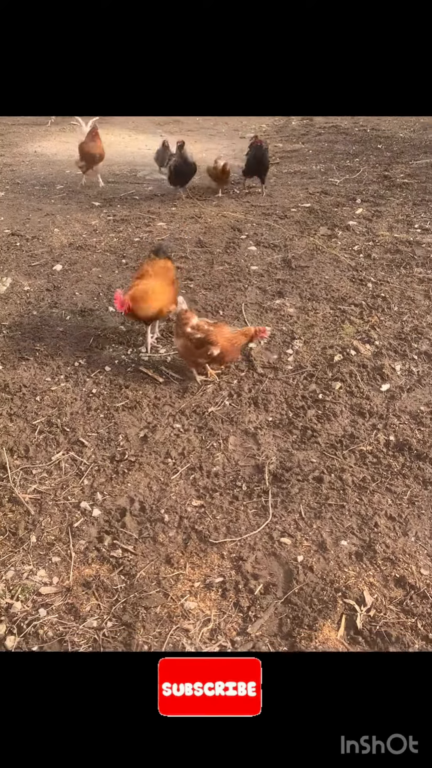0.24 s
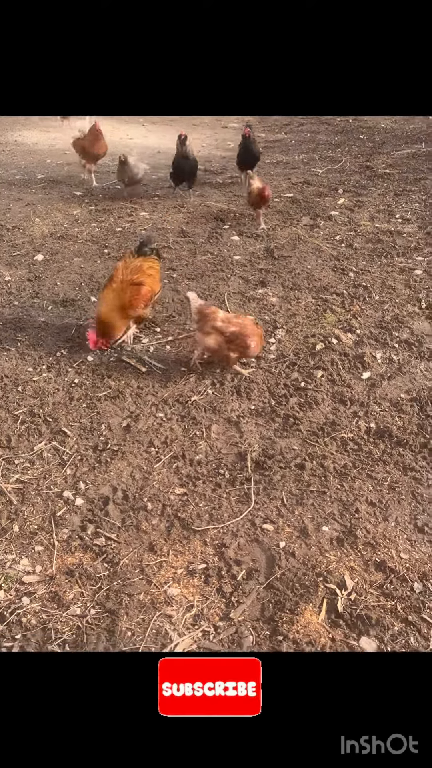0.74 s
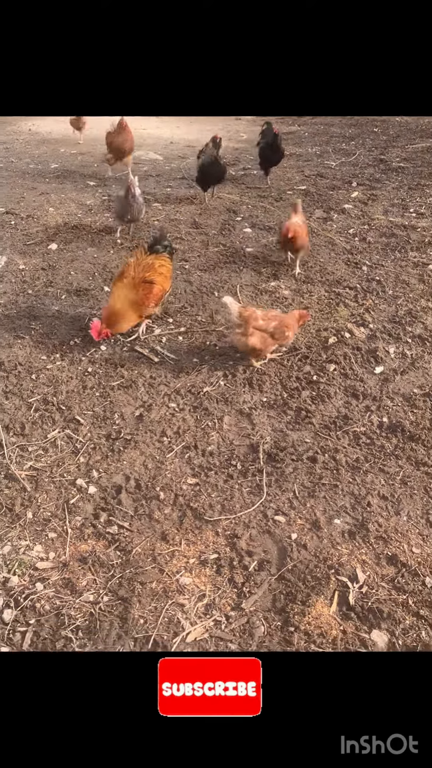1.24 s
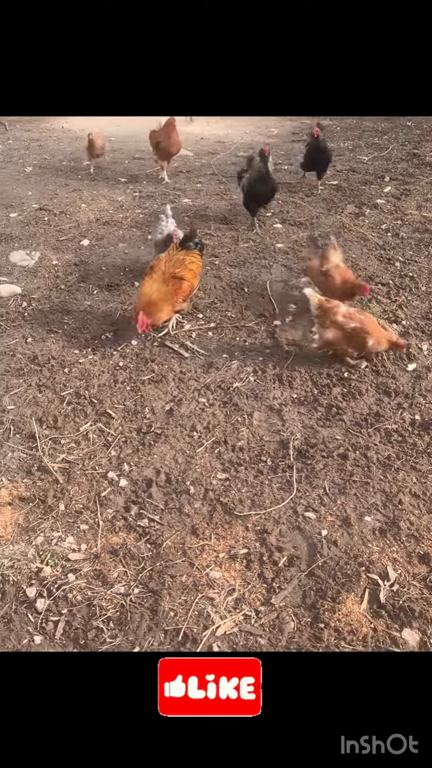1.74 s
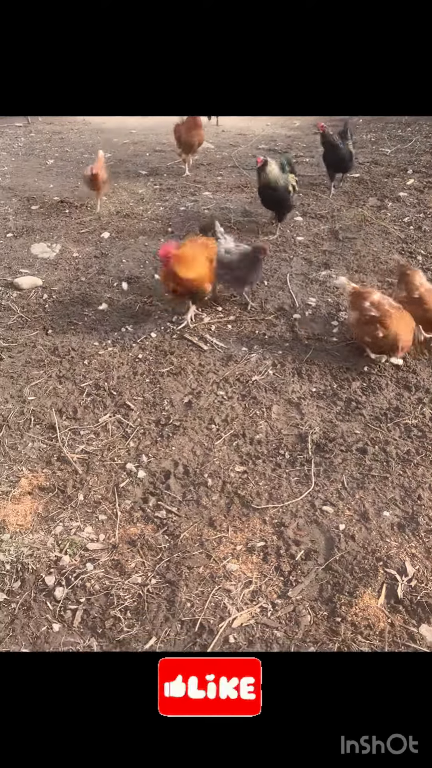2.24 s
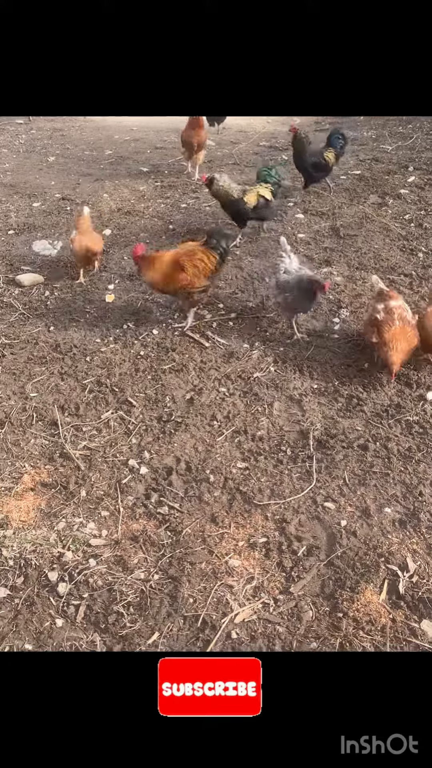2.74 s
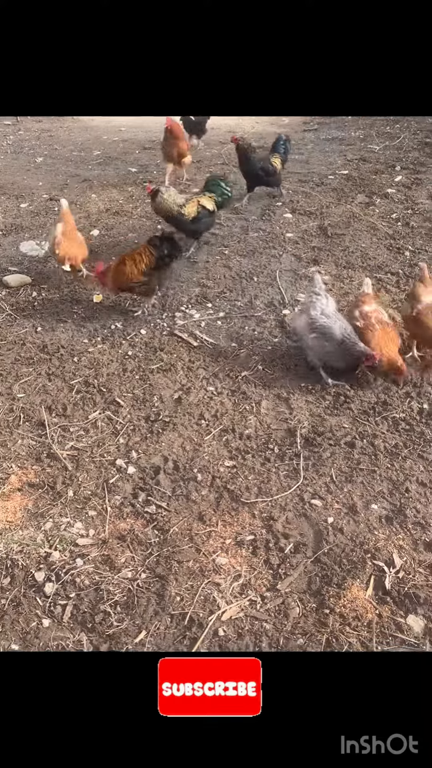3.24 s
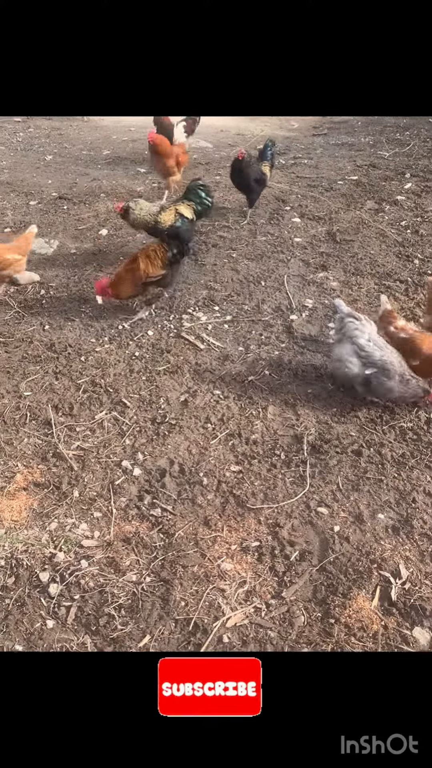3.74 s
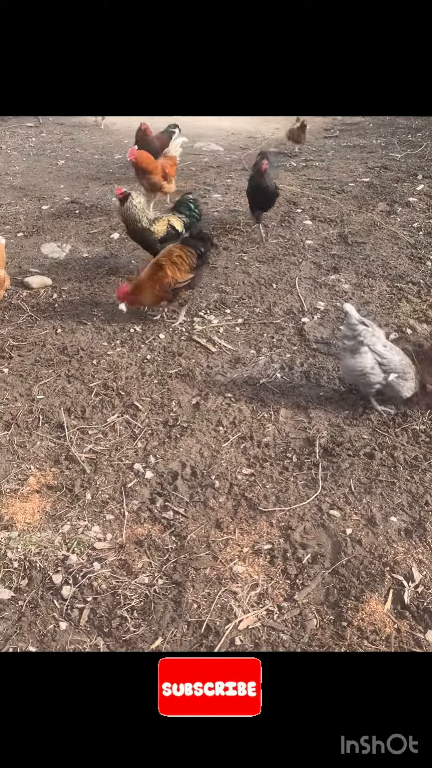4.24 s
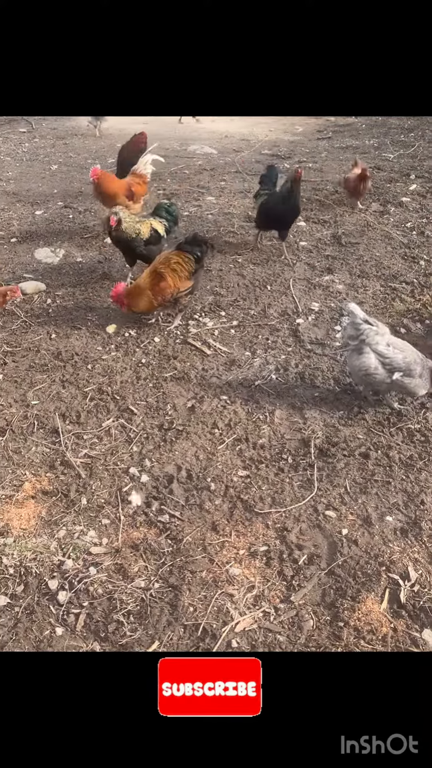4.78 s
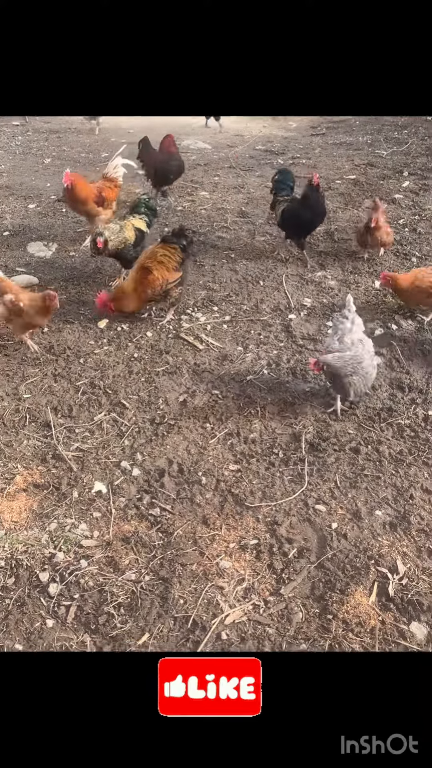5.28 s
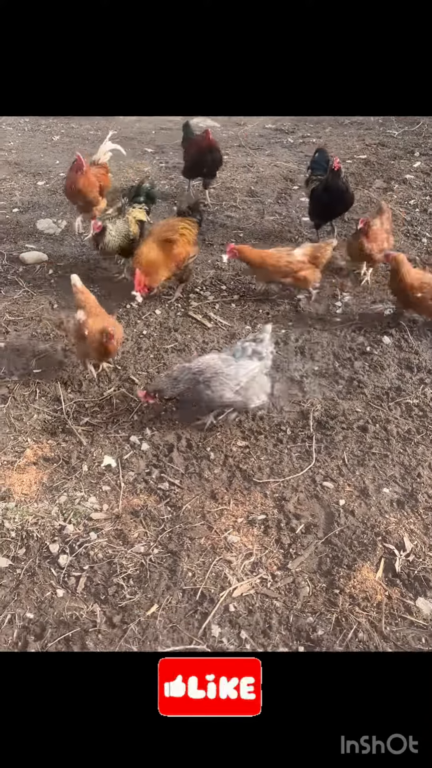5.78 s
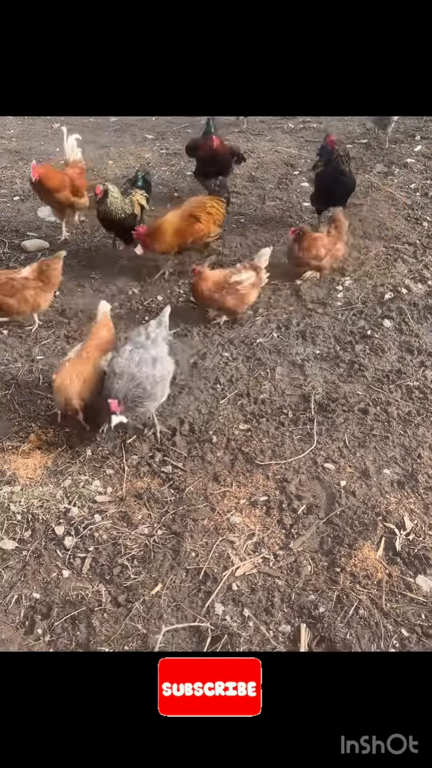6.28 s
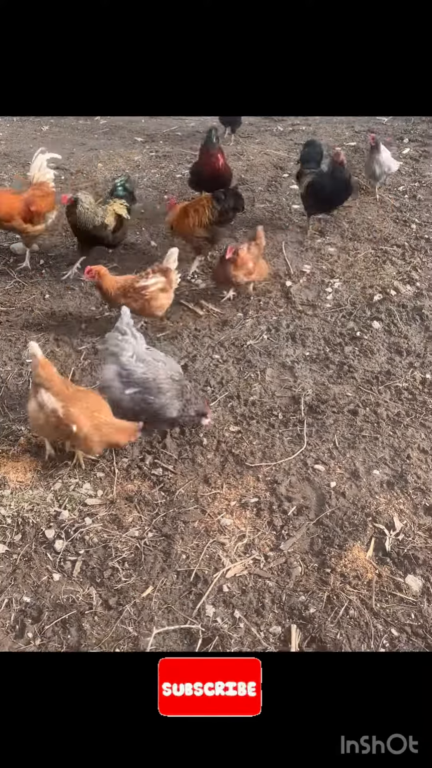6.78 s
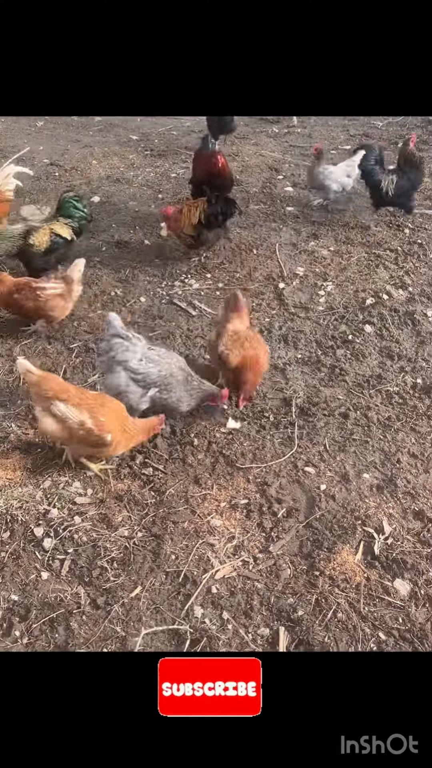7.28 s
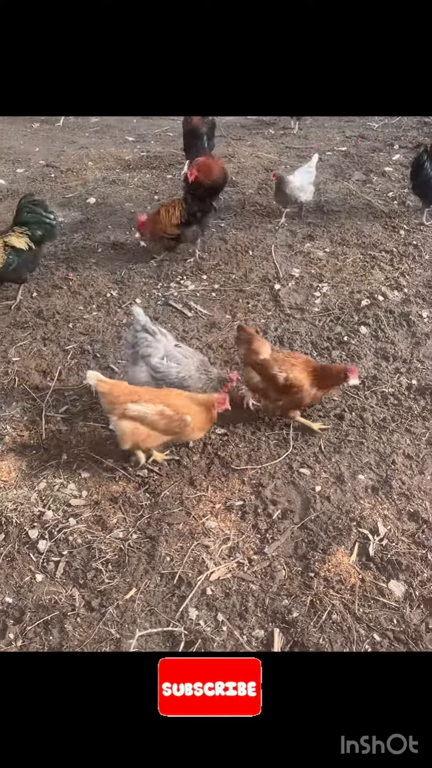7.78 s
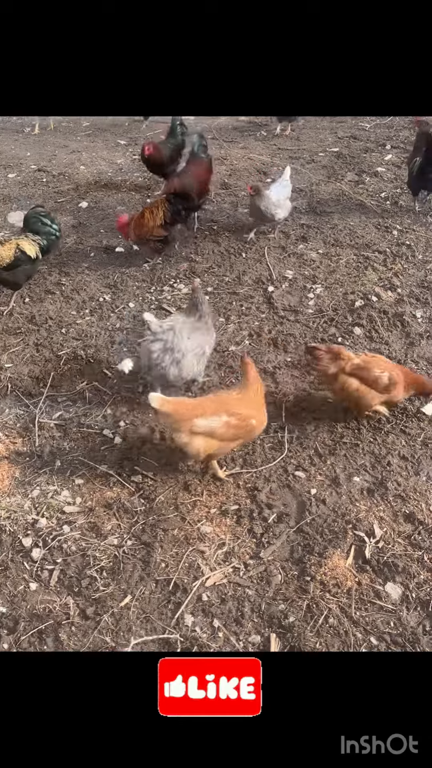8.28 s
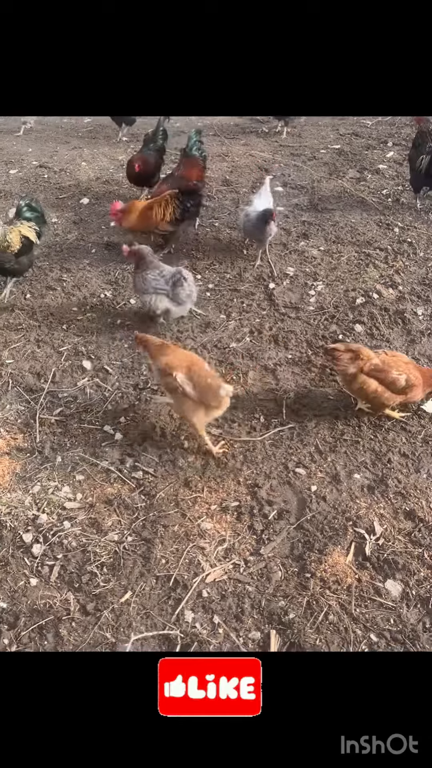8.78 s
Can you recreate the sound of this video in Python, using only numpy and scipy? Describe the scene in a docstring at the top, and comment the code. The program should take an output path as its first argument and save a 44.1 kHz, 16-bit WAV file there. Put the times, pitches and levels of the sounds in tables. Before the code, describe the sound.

Outdoor dirt yard, close microphone, wide treble, faint air and uneven low rumble. A dull rustle opens from 0 to 0.5 s with a short cluck and peck. At 0.5 s a near rooster crows loudly: a rough short syllable, a higher one from 0.8 s, then a held note from 1.4 to 2.7 s, swelling, turning raspy and sagging in pitch, with slight yard echo. From 2.7 s hens give short, dry clucks, with crisp pecks, soft thuds and a strong straw snap near 3.4 s. Quieter clucks run from 4 to 5.5 s, with a tiny peep at 4.65 s. Litter crackles more from 5.5 to 7.5 s, with many snaps and two firmer clucks around 6.5 and 6.8 s. A distant, hoarse rooster answers from 6.8 to 8.3 s. A pop comes at 7.95 s, then a bright scratch at 8.8 s amid low clucks.

```python
"""A dull rustle opens over faint air, rumble and the hiss of dry litter; hens cluck and peck, soft thuds below.
A rooster soon crows close by in three syllables; much later a second one answers from far off.
Voices are membrane pulses or harmonics through resonances; ground sounds are shaped noise and decaying tones.
Straws snap, a peep and a pop sound once each, a bright scratch comes late; the treble is spread in stereo."""
import sys
import numpy as np
from scipy import signal
from scipy.fft import rfft, irfft, next_fast_len
from scipy.io import wavfile
from scipy.ndimage import uniform_filter1d

SR = 44100
rng = np.random.default_rng(int(sys.argv[2]) if len(sys.argv) > 2 else 0)


def dump_mix(stems):
    """Bounce the given channels to the path in sys.argv[1] as a 16-bit WAV at rate SR."""
    frames = np.atleast_2d(stems).T  # one column per channel
    limited = np.clip(frames, -1, 1)  # hard clip at full scale
    pcm = np.round(limited * 32767).astype(np.int16)
    wavfile.write(sys.argv[1], SR, pcm)


N = 397782
T = np.arange(N) / SR
EDGE_HZ = 15900  # upper band limit

# breaking straw: hz, gain_db
STRAW_BREAK_COLOUR = [(5000, -32), (7600, -27), (8300, -4), (12000, -5), (16000, -1)]


def amp(db):
    """Decibels to gain."""
    return 10 ** (np.asarray(db) / 20)


def unit(x):
    """Scales to rms 1."""
    return x / np.sqrt(np.mean(x ** 2) + 1e-20)


def steady(x, size=700):
    """Holds the running rms at 1 over a window of size samples."""
    return x / np.sqrt(abs(uniform_filter1d(x ** 2, size)) + 1e-14)


def read(points, hz):
    """Reads a table on a log-frequency axis."""
    f, value = np.transpose(points)
    return np.interp(np.log(hz + 1), np.log(f + 1), value)


def shape(x, gain):
    """Filters x by a gain that is a function of frequency."""
    size = next_fast_len(len(x) + 2048)
    spectrum = rfft(x, size) * gain(np.fft.rfftfreq(size, 1 / SR))
    return irfft(spectrum, size)[:len(x)]


def colour(x, points):
    """Filters x by a (hz, gain_db) table."""
    return shape(x, lambda f: amp(read(points, f)))


def ring(x, modes):
    """Filters x by steep (hz, width_hz, gain_db) resonances."""
    def gain(f):
        return sum(amp(db) / (1 + (2 * (f - hz) / width) ** 2) ** 2 for hz, width, db in modes)
    return shape(x, gain)


def noise(points, count=N):
    """Coloured noise of rms 1."""
    return unit(colour(rng.standard_normal(count), points))


def drift(count, rate_hz):
    """Smooth random curve of rms 1, rolled off above rate_hz."""
    return unit(shape(rng.standard_normal(count), lambda f: np.exp(-(f / rate_hz) ** 2)))


def add(mix, s, sound):
    """Adds a sound to the mix at time s."""
    part = mix[max(round(s * SR), 0):][:len(sound)]
    part += sound[:len(part)]


def controls(rows):
    """Joins the rows of a table into one curve per column after time."""
    s, *columns = np.transpose(rows)
    t = np.arange(s[0], s[-1], 1 / SR)
    return [np.interp(t, s, c) for c in columns]


def air():
    """Steady yard air, as coloured noise, over a lumpy low rumble."""
    # rumble: time_s, relative_db
    rumble_curve = [(0.0, -69.5), (0.68, -69), (1.21, -83), (1.66, -63.5), (3.24, -68.5), (3.42, -79.5),
                    (5.57, -70.5), (6.28, -83.5), (6.73, -75.5), (7.21, -61), (7.84, -85), (8.11, -64),
                    (9.02, -84.5)]
    # rumble: hz, gain_db
    rumble_colour = [(15, -28.5), (40, 1.5), (70, 3), (120, -9.5), (400, -26), (4000, -100)]
    # air and hiss: hz, gain_db
    air_colour = [(90, -5.5), (180, -18), (350, -20.5), (570, -13), (850, -19.5), (1300, -22.5),
                  (2000, -29.5), (3500, -47), (5500, -37), (7700, -30), (8300, -46), (11000, -35.5),
                  (14000, -15.5), (15700, -21)]
    lumps_db = 3.5 * drift(N, rate_hz=10)
    rumble_db = np.interp(T, *np.transpose(rumble_curve)) + 10.5 + lumps_db
    rumble = noise(rumble_colour) * amp(rumble_db)
    return rumble + amp(-69.5) * noise(air_colour) * amp(1.5 * drift(N, rate_hz=21))


def litter(grains_per_s=80, spread_db=3.3, grain_decay_s=0.00047):
    """Feet stir straw and crumbs: fine hiss plus crackles made of decaying noise grains."""
    # stirring: time_s, relative_db
    stir_curve = [(0, -69), (.5, -61.5), (2.7, -62), (3.4, -61), (4.2, -63.5), (5, -62.5), (5.6, -57),
                  (6.3, -55.5), (6.7, -59.5), (7.3, -56.5), (7.8, -64.5), (8.2, -64.5), (8.6, -62.5)]
    # straw: hz, gain_db
    straw_colour = [(1500, -48), (4000, -11), (7600, -15), (8200, -9.5), (11000, -3.5), (14000, 1),
                    (16000, 7)]
    strength = amp(spread_db * np.minimum(rng.exponential(1, N), 4))
    clicks = (rng.random(N) < grains_per_s / SR) * strength
    grains = signal.lfilter([1], [1, -np.exp(-1 / (grain_decay_s * SR))], clicks)
    grains = grains * rng.standard_normal(N)
    level = amp(np.interp(T, *np.transpose(stir_curve)) + 1.8 * drift(N, rate_hz=13))
    hiss = amp(-1.0) * noise(straw_colour)
    crackle = amp(-3.5) * unit(colour(grains, straw_colour))
    return level * (hiss + crackle)


def scrape(rows, points, flutter_db):
    """Friction stroke: coloured noise with a drawn level and random flutter."""
    db, = controls(rows)
    count = len(db)
    out = np.zeros(N)
    stroke = noise(points, count=count) * amp(db + flutter_db * drift(count, rate_hz=35))
    add(out, rows[0][0], stroke * signal.windows.tukey(count, .03))
    return out


def rustle():
    """Dull friction noise at the start, and again softly as feet shuffle."""
    # first rustle: time_s, relative_db
    first_curve = [(0.0, -55.5), (.17, -54.5), (.27, -68), (.33, -73), (.38, -63.5), (.43, -67),
                   (.53, -61.5)]
    # shuffling feet: time_s, level_db
    shuffle_curve = [(5.12, -83.5), (5.28, -76), (5.38, -79.5), (5.47, -72.5), (5.68, -79)]
    # both: hz, gain_db
    dull_colour = [(90, -14), (140, -3.5), (330, 6), (650, 3.5), (1000, -7), (1300, -18.5), (2300, -16.5),
                   (3000, -30.5), (4000, -16), (8000, -35)]
    first = amp(3.0) * scrape(first_curve, dull_colour, flutter_db=1.0)
    return first + scrape(shuffle_curve, dull_colour, flutter_db=3.5)


def syrinx(hz, rough, jitter, half_share, breath, waver_db=0):
    """Membrane pulses with wavering overtones; when rough they jitter, alternate in strength, leak puffs."""
    count = len(hz)
    turns = np.cumsum(hz * (1 + jitter * rough * drift(count, rate_hz=150))) / SR
    pulses = np.zeros(count)
    for k in range(1, 29):
        waver = amp(waver_db * drift(count, rate_hz=7.7)) if waver_db else 1
        pulses += np.cos(2 * np.pi * k * turns) * (k * hz < EDGE_HZ) * waver
    pulses = unit(pulses) * (1 + half_share * rough * np.cos(np.pi * turns))
    puffs = unit((1 + np.cos(2 * np.pi * turns) / 2) * rng.standard_normal(count))
    return turns, pulses + breath * rough * puffs


def hens(swell=1.3, sag=0.11, linger_s=.003, chest_hz=700, beak_sharpness=2.0):
    """Clucks: a few sagging pulses swell and stop short through chest, throat and a beak loudest mid-note."""
    # clucks: start_s, length_s, pitch_hz, throat_hz, relative_db, chest_re_throat_db, beak_re_throat_db,
    # roughness (0-1)
    clucks = [(.122, 0.028, 303, 1410, -48.5, 2.5, -8, 0.78), (0.776, .032, 204, 390, -49.5, 2.5, -34, .2),
              (2.741, 0.033, 315.3, 890, -52, -8.5, -22, 0.52),
              (2.888, .034, 314, 844, -51.5, -10.5, -18, 0.51),
              (3.115, 0.037, 328.4, 910, -61.5, -7, -19, 0.77),
              (3.203, 0.043, 299.6, 856, -46.5, -7, -14.5, 0.54),
              (3.571, 0.035, 259.7, 599, -63, -5, -27.5, .65), (4.04, 0.029, 290, 792, -67, -4, -15, 0.55),
              (4.137, .026, 293, 782, -64, -1.5, -19.5, 0.38),
              (4.21, 0.032, 247, 600, -68.5, 3.5, -24, .42), (4.27, 0.031, 303, 797, -63.5, -1, -21, 0.54),
              (4.35, 0.038, 269, 706, -58.5, 3, -28, 0.33), (4.439, 0.035, 451, 1350, -62, -14, -14, 0.28),
              (4.539, .029, 485, 1380, -70.5, -12, -21, 0.48),
              (4.643, 0.055, 412.4, 1057, -66.5, 4, -18.5, 0.48),
              (4.739, 0.046, 347.4, 1010, -64, -20.5, -23, .25),
              (4.894, 0.024, 293, 710, -69, -5, -11, 0.46),
              (4.916, 0.041, 429, 990, -65.5, -12, -25.5, 0.07),
              (5.1, 0.034, 432, 1060, -63.5, -22, -29, 0.08), (5.191, .035, 470, 1390, -73, -11, -15, 0.38),
              (5.453, .025, 228, 612, -64.5, 5.5, -23, 0.42),
              (5.821, 0.05, 237.5, 762, -51.5, 5.5, -16, 0.54),
              (5.876, 0.015, 392, 1384, -61, 2, -10, 0.92),
              (5.929, 0.037, 271.5, 760, -55.5, 2.5, -11.5, 0.42),
              (6.149, 0.028, 303.5, 760, -64.5, -3.5, -19, .51),
              (6.384, 0.026, 314.6, 786, -63.5, -6, -13, 0.29),
              (6.497, 0.043, 321.3, 743, -43, -23, -14.5, 0.14),
              (6.772, .027, 465, 1110, -45, -28, -16.5, 0.15),
              (7.071, 0.029, 331.6, 800, -53.5, -0.5, -12, 0.6),
              (7.175, 0.038, 235.5, 430, -54, 9.5, -24, 0.21),
              (7.54, 0.031, 289, 574, -52, -23.5, -39, 0.14),
              (8.015, 0.029, 358, 1430, -50, -8.5, -11, 0.73),
              (8.416, 0.029, 201, 397.6, -68.5, 7, -16, 0.48),
              (8.519, 0.027, 192, 376, -61.5, 2, -23, 0.08),
              (8.647, 0.027, 229.6, 416, -62, 5.5, -21, 0.09), (8.854, .036, 214.7, 690, -55, 6, -18, 0.3)]
    # beak: hz, width_hz, gain_db
    beak_modes = [(1870, 800, 1.5), (2558, 470, -0.5), (3780, 1200, -8)]
    out, margin = np.zeros(N), SR // 200

    def linger(f):  # phase only: low tones come later
        return np.exp(-2j * np.pi * linger_s * chest_hz * np.log1p(f / chest_hz))

    for s, length, hz, throat_hz, db, chest_db, beak_db, rough in clucks:
        u = np.linspace(0, 1, int(length * SR))
        effort = np.sin(np.pi * u ** swell).clip(0)
        sagging_hz = hz * (1 + sag * (.5 - u))
        _, pulses = syrinx(sagging_hz, np.clip(rough, 0, 1), jitter=.2, half_share=.9, breath=1.6)
        note = shape(np.pad(pulses * effort, margin), linger)
        crest = np.pad(pulses * effort ** beak_sharpness, margin)
        chest = unit(ring(note, [(236, 440, 0)]))
        throat = unit(ring(note, [(throat_hz, .55 * throat_hz, 0), (950, 400, -16)]))
        beak = unit(ring(crest, beak_modes))
        cluck = throat + amp(chest_db) * chest + amp(beak_db) * beak
        add(out, s - margin / SR - linger_s / 2, amp(db - 5.0) * cluck)
    return out


def pecks(t60_s=0.039, knock_t60_s=0.047, brush_s=0.015, brush_db=-19):
    """A beak brushes into dry litter, then hits: a bright decaying snap over a duller knock."""
    # pecks: hit_s, snap_db, knock_relative_db
    peck_rows = [(.245, -54.5, 9), (.7527, -49.5, 0), (2.67, -50, -17), (3.011, -62.5, 4),
                 (3.234, -44.5, -9), (3.354, -39, -20), (4.417, -60.5, 4.5), (4.741, -64, 3),
                 (4.7648, -41, -18), (4.8505, -45, -16.5), (5.2509, -54, -0.5), (5.27, -66, 5),
                 (5.6547, -48, -16), (6.516, -44, -10), (7.3756, -49.5, -24), (8.388, -45, -9)]
    knock_colour = [(900, 5), (2000, -2), (4000, -3), (7000, 1.0), (10000, -25.0)]  # hz, gain_db
    out, t = np.zeros(N), np.arange(-SR // 50, SR // 20) / SR
    brush = amp(brush_db) * np.exp(-abs(t) / brush_s)
    for s, db, knock_db in peck_rows:
        snap = noise(STRAW_BREAK_COLOUR, count=len(t))
        knock = noise(knock_colour, count=len(t)) * amp(-60 * abs(t) / knock_t60_s)
        hit = snap * amp(-60 * abs(t) / t60_s) + amp(knock_db - 9.0) * knock
        add(out, s + t[0], amp(db) * np.where(t < 0, brush * snap, hit))
    return out


def thuds(rise_s=0.015, scuff_db=-7):
    """Soft blows: a few cycles of bass with a little scuff under one rise and decay."""
    # thuds: start_s (sounded 3 ms early), relative_db, pitch_hz
    thud_rows = [(.334, -60, 58), (.885, -51, 67.8), (1.566, -51, 103), (1.866, -51, 91.2),
                 (2.364, -49.5, 49.3), (2.453, -45, 81), (2.966, -54, 59.5), (3.222, -43, 84),
                 (3.253, -44.5, 90), (3.292, -50, 69.4), (3.595, -53.5, 70), (4.405, -52, 95.8),
                 (4.489, -58, 90), (4.64, -56.5, 108), (6.321, -41, 72), (7.235, -48, 70),
                 (7.447, -54.5, 61.8), (7.906, -51, 78.5), (8, -50.5, 57)]
    # scuff: hz, gain_db
    scuff_colour = [(20, -5), (130, 2.5), (250, -12.5), (500, -27.5), (5000, -85)]
    out, t = np.zeros(N), np.arange(SR // 6) / SR
    envelope = (t / rise_s * np.exp(1 - t / rise_s)) ** 2
    for s, db, hz in thud_rows:
        blow = np.sin(2 * np.pi * hz * t) + amp(scuff_db) * noise(scuff_colour, count=len(t))
        add(out, s - .003, amp(db + 9.0) * blow * envelope)
    return out


def roughness(t, lock_s, break_s, rough_before, rough_locked):
    """The voice starts rough, locks into a cleaner tone and breaks up; the held note catches once."""
    locked = (1 + np.tanh((t - lock_s) / 0.003)) / 2
    broken = (1 + np.tanh((t - break_s) / 0.0087)) / 2
    catch = 0.25 * np.exp(-((t - 2.3) / 0.027) ** 2)
    rough = rough_before * (1 - locked) + rough_locked * (locked - broken) + .75 * broken + catch
    return rough, locked


def strained_rasp(pulses, t, band_hz=500):
    """Uneven pulses fray every overtone; the rasp spurts and each band sputters by itself."""
    # strain in the held note: time_s, relative_db
    rasp_curve = [(1.7, -87.5), (1.9, -76), (1.96, -70.5), (2.06, -80), (2.13, -65.5), (2.19, -63),
                  (2.27, -71), (2.33, -68.5), (2.4, -73), (2.47, -64), (2.53, -82), (2.6, -105)]
    # rasp: hz, gain_db
    rasp_colour = [(300, 9), (1000, 1), (1500, 0), (2700, -4), (3400, -7), (4050, 4), (4650, -14),
                   (5400, -4.5), (8000, -8)]
    count = len(t)
    frayed = colour(pulses * drift(count, rate_hz=330), rasp_colour)
    frayed = frayed * amp(1.8 * drift(count, rate_hz=55))
    leak = np.zeros(count)
    for centre_hz in band_hz * np.arange(1, 18):
        sputter = amp(2.5 * drift(count, rate_hz=60))
        leak += ring(frayed, [(centre_hz, 2 * band_hz, 0)]) * sputter
    rasp_db = np.interp(t, *np.transpose(rasp_curve), left=-100, right=-100) + 9.5
    return unit(leak) * amp(rasp_db)


def syllable(curve, lock_s, break_s, rough_before, rough_locked, swing):
    """Pulses through a throat resonant near the second harmonic, with beak and shrill overtones above."""
    # upper throat as the beak moves: start_s, end_s, [(hz, width_hz, gain_db)]
    throat_stages = [(.4, 0.796, [(1770, 650, 6.5), (2480, 1900, -6.5), (4900, 340, -4.5),
                     (6200, 2600, -4.5)]), (.8, 1.384, [(3763, 236, 10), (5883, 1040, -7),
                     (6380, 330, -10.5), (7230, 560, 1)]), (1.38, 1.97, [(4898, 150, 8), (5850, 750, 0),
                     (6890, 570, -12)]), (1.97, 2.35, [(4870, 260, 5), (5470, 520, 5), (6800, 510, -1.5)]),
                     (2.35, 2.799, [(5100, 480, -3), (5830, 490, 14), (7200, 630, -11)])]
    # open beak: hz, width_hz, gain_db
    beak_modes = [(1890, 580, -5.5), (2750, 250, 2.5)]
    # main throat resonance: hz, gain_db
    bell_colour = [(800, -32.5), (1000, -7.5), (1150, -10), (1400, 4), (1720, -13.5), (1840, -15),
                   (1980, -49), (2500, -73.5)]
    # top of the voice: hz, gain_db
    sizzle_colour = [(7400, -49.5), (8400, -2.5), (10300, 4), (10800, 2.5), (12800, -1), (13800, 6),
                     (15700, 1)]
    hz, effort_db, fundamental_db, beak_db, shrill_db = controls(curve)
    count = len(hz)
    t = curve[0][0] + np.arange(count) / SR
    rough, locked = roughness(t, lock_s, break_s, rough_before, rough_locked)
    # slow tremble and fast flutter of pitch
    trembling_hz = hz * (1 + .003 * drift(count, rate_hz=30) + .002 * drift(count, rate_hz=230))
    turns, pulses = syrinx(trembling_hz, rough, jitter=.04, half_share=0.19, breath=0.56, waver_db=5.5)

    base_gain = amp(fundamental_db + 3 * drift(count, rate_hz=23))
    base = base_gain * steady(ring(pulses, [(670, 560, 0)]))
    # a rough membrane rattles, throwing sidebands around the main resonance
    rattle = 1 + rough ** 2 * (0.31 * np.cos(np.pi * turns) + 0.57 * drift(count, rate_hz=590))
    bell_gain = amp(effort_db - 1.8 + 1.16 * drift(count, rate_hz=24))
    bell = bell_gain * steady(colour(pulses, bell_colour) * rattle)
    beak = amp(beak_db + 3 * drift(count, rate_hz=25)) * steady(ring(pulses, beak_modes))
    upper = np.zeros(count)
    for start, end, modes in throat_stages:
        fade = uniform_filter1d(1. * ((start <= t) & (t < end)), size=3000)
        upper += ring(pulses, modes) * fade
    shrill = amp(shrill_db - 1) * steady(upper)

    # sizzle grows 0.23 dB per dB of effort, capped 8 dB under it; then 10.5 dB weaker unlocked, 3.5 locked
    sizzle_db = np.minimum(-49.5 + 0.23 * (effort_db + 27.5), effort_db - 8)
    sizzle = amp(sizzle_db - 7 * (1.5 - locked)) * steady(colour(pulses, sizzle_colour))
    rasp = strained_rasp(pulses, t)

    # above -41.5 dB of effort the main resonance leans right
    left = amp(-swing * np.maximum(effort_db + 41.5, 0))
    gains = np.array([left, np.ones(count)]) * np.sqrt(2 / (1 + left ** 2))
    ends = np.clip(np.minimum(t - t[0], t[-1] - t) / 0.006, 0, 1)
    return (base + gains * bell + beak + shrill + sizzle + rasp) * ends


def rooster():
    """The near crow: a short syllable, a longer one and the held note, each driven by its own curves."""
    # three syllables: time_s, pitch_hz, effort_db, fundamental_db, beak_db, shrill_relative_db
    OPENING = [(.516, 404, -58.5, -77.5, -73.5, -63), (.529, 448.3, -37, -68, -59, -53),
               (.545, 537, -32, -62, -58.5, -48.5), (.566, 581.4, -39, -59, -51.5, -46),
               (.594, 605, -32.5, -58, -57.5, -50), (.599, 699.3, -24.5, -46, -69, -44),
               (.646, 703, -23, -53, -58.5, -48.5), (.668, 691, -39, -47.5, -68.5, -51.5),
               (.725, 696, -56.5, -56.5, -73.5, -65)]
    MIDDLE = [(.819, 475.6, -55.5, -80.5, -70.5, -72.5), (.826, 498, -38, -69, -47.5, -56),
              (.84, 581.7, -35.5, -46, -58, -54.5), (.852, 725.8, -24.5, -42.5, -48.5, -40),
              (.9, 759.2, -25, -38.5, -61, -42.5), (.972, 714.3, -38.5, -56, -80, -57),
              (1.075, 756, -40, -67, -81.5, -60.5), (1.14, 737, -40, -55, -83, -56.5),
              (1.27, 725.5, -43.5, -59.5, -88, -61), (1.385, 689, -54, -61.5, -69, -66)]
    HELD = [(1.385, 709, -52.5, -68, -72.5, -68), (1.405, 690, -47, -59.5, -75.5, -67.5),
            (1.42, 679, -40, -49.5, -72, -68.5), (1.53, 693, -39.5, -66.5, -74, -67.5),
            (1.6, 681, -33, -44.5, -71, -63), (1.68, 701, -37, -60, -77, -63),
            (1.74, 695.2, -29, -49.5, -67, -49), (1.88, 696.5, -33.5, -54, -72, -57),
            (2, 695.3, -26, -56, -71.5, -45.5), (2.06, 686, -31.5, -50, -75, -50.5),
            (2.15, 686, -24.5, -41.5, -63.5, -52), (2.22, 671.4, -27.5, -42.5, -72, -58.5),
            (2.29, 670.8, -26, -56, -74.5, -63), (2.41, 658.2, -27.5, -43.5, -76.5, -53.5),
            (2.46, 654, -33, -55, -76, -51.5), (2.595, 637, -41.5, -60.5, -85, -57),
            (2.62, 625.5, -54.5, -54, -88, -67), (2.636, 629.6, -43.5, -66, -89.5, -76),
            (2.675, 610.5, -67, -60, -99, -90)]
    # syllables: curve, lock_s, break_s, rough_before (0-1), rough_locked (0-1), swing_right (dB per dB effort)
    syllables = [(OPENING, .594, .644, .4, .34, 0.47), (MIDDLE, .85, 1.295, 0.59, 0.013, 0.95),
                 (HELD, 1.44, 2.628, 0.6, .025, 1.24)]
    out = np.zeros((2, N))
    for row in syllables:
        for channel, sound in zip(out, syllable(*row)):
            add(channel, row[0][0][0], sound)
    return out


def snaps(crack_s=.0007, splinter_db=-15, splinter_s=.005):
    """A dry straw snaps: one very short, bright noise crack among softer splinters."""
    # snaps: crack_s, level_db
    snap_rows = [(3.3792, -28), (5.6316, -47), (5.8426, -44), (6.357, -45), (6.738, -47), (6.9536, -44),
                 (4.178, -39), (5.4874, -44), (8.131, -50), (5.7255, -34), (6.003, -39), (6.035, -46),
                 (6.209, -41.5), (6.408, -43), (6.4265, -36), (6.931, -43), (6.974, -34), (7.2998, -37),
                 (7.3292, -44), (7.5223, -51), (8.737, -36)]
    out, t = np.zeros(N), np.arange(-SR // 100, SR // 30) / SR
    crack = (t >= 0) * np.exp(-abs(t) / crack_s)
    envelope = crack + amp(splinter_db) * np.exp(-abs(t) / splinter_s)
    for s, db in snap_rows:
        add(out, s + t[0], amp(db) * envelope * noise(STRAW_BREAK_COLOUR, count=len(t)))
    return out


def peep(s=4.657, length_s=.045, start_hz=3080, sag_hz_per_s=5000, db=-70, waver_hz=170):
    """One faint, high, scratchy peep: a falling sine with fast random pitch waver."""
    out, t = np.zeros(N), np.arange(0, length_s, 1 / SR)
    hz = start_hz - sag_hz_per_s * t + waver_hz * drift(len(t), rate_hz=420)
    tone = np.sin(2 * np.pi * np.cumsum(hz) / SR)
    add(out, s, amp(db) * tone * np.hanning(len(t)))
    return out


def drag():
    """A claw drags through straw: one uneven friction stroke."""
    # drag: time_s, level_db
    drag_curve = [(5.53, -87), (5.57, -71), (5.7, -89)]
    # drag: hz, gain_db
    drag_colour = [(2500, -44), (3800, 11), (6000, 11), (9000, -10)]
    return scrape(drag_curve, drag_colour, flutter_db=6)


def far_rooster(strain=0.71, flutter_db=2.0):
    """The answering crow: harmonics 1, 1.5 and 2 of a wavering pitch, hoarser the louder it gets."""
    # overlapping notes, each: time_s, pitch_hz, relative_db, second_harmonic_relative_db, half_relative_db
    far_notes = [
        [(6.75, 668, -71, 2, -10), (6.82, 660, -67.5, 9, -16), (6.85, 657, -72, 5, -6), (6.865, 845, -66, 0, 1),
         (6.92, 850, -65, 4, 3), (6.97, 842, -79, -3, -4)],
        [(7.07, 761, -59, -4, -2), (7.11, 799, -54, -5.5, -16), (7.148, 895.5, -53.5, -5, -17),
         (7.195, 800.6, -54.5, -3, -13.5), (7.26, 830, -69.5, -1, -19), (7.33, 832, -60, -3.5, -16),
         (7.45, 845.6, -69, -1, -15), (7.53, 820, -73, -19.5, -14.5)],
        [(7.3, 674, -65, -11.5, -19), (7.42, 660, -66.5, -6.5, -24), (7.64, 646, -71, -23, -28.5)],
        [(7.64, 708.5, -61, -20.5, -23.5), (7.76, 732, -73, -6, -19), (7.9, 731, -61, -7, -1),
         (7.99, 697, -58, -2.5, -7), (8.11, 676.3, -68, 3, -12), (8.22, 669.7, -64, -0.5, -12),
         (8.36, 649.5, -79, -0.5, -10)],
    ]
    # hoarse noise: hz, gain_db
    hoarse_colour = [(400, -4), (800, 11), (1200, 5), (1800, 4.5), (2100, -3), (2400, -22), (2960, -5.5),
                     (3400, -9), (4200, -16.5), (5500, -67)]
    out = np.zeros(N)
    for curve in far_notes:
        hz, db, second_db, half_db = controls(curve)
        count = len(hz)
        phase = 2 * np.pi * np.cumsum(hz * (1 + .023 * drift(count, rate_hz=80))) / SR
        tone = np.cos(phase) + amp(second_db) * np.cos(2 * phase) + amp(half_db) * np.cos(1.5 * phase)
        hoarse_db = -11.5 + strain * np.maximum(db + 62, 0)
        hoarse = amp(hoarse_db) * noise(hoarse_colour, count=count) * (1 + np.cos(phase))
        level = amp(db + flutter_db * drift(count, rate_hz=44))
        voice = (np.sqrt(2) * tone + hoarse) * level
        add(out, curve[0][0], voice * signal.windows.tukey(count, .1))
    return out


def pop(s=7.944, db=-34, from_hz=1900, to_hz=540, fall_s=0.00182, peak_s=0.0057, width_s=0.0049,
        scuff_db=-14):
    """One sharp pop: a few cycles that drop quickly in pitch, inside a short noise scuff."""
    scuff_colour = [(200, 5), (600, -4), (1500, 3.5), (2400, -38), (3500, -8.5), (5000, -23.5)]  # hz, gain_db
    out, t = np.zeros(N), np.arange(-SR // 100, SR // 25) / SR
    hz = to_hz + (from_hz - to_hz) * np.exp(-np.maximum(t, 0) / fall_s)
    tone = np.sin(2 * np.pi * np.cumsum(hz) / SR) / np.cosh(2 * (t - peak_s) / width_s)
    scuff = noise(scuff_colour, count=len(t)) * np.exp(-abs(t - peak_s) / .009)
    add(out, s + t[0], amp(db) * (tone + amp(scuff_db) * scuff))
    return out


def swish():
    """A bright scratch: one friction stroke that swells and fades."""
    # swish: time_s, relative_db
    swish_curve = [(8.66, -93.5), (8.794, -51.5), (8.94, -88.5)]
    # swish: hz, gain_db
    swish_colour = [(3000, -31.5), (5000, -22), (5800, -20), (6500, -9.5), (7600, -11.5), (8200, 9),
                    (9300, 6.5), (11000, 0.5), (12800, -17), (14500, 6.5), (15700, -17)]
    return amp(11.0) * scrape(swish_curve, swish_colour, flutter_db=2.5)


def yard(x):
    """Scattered echoes from ground, fences and sheds: sparse random taps whose treble dies first."""
    # decay: hz, t60_s
    decay_times = [(200, 0.87), (1400, 0.72), (3000, 0.73), (8000, 0.23), (15000, 0.13)]
    taps = rng.standard_normal((2, SR)) * (rng.random((2, SR)) < 1500 / SR) * (T[:SR] > .012)
    hz, t, z = signal.stft(taps, SR, nperseg=256)
    decay = amp(-60 * t / read(decay_times, hz)[:, None])
    tail = signal.istft(z * decay, SR, nperseg=256)[1]
    return signal.fftconvolve(x[None], tail / np.linalg.norm(tail[0]), axes=1)[:, :N]


def scene():
    """Birds and ground sounds in the open yard; only the birds and the pop feed the echoes."""
    crow, far = rooster(), far_rooster()
    small_sounds = hens() + pop() + peep()
    ground = pecks() + snaps() + thuds() + litter() + air()
    ground = ground + rustle() + swish() + drag()
    echoes = yard(amp(-18.5) * crow.mean(0) + amp(-20.5) * small_sounds + amp(-6.5) * far)
    return crow + small_sounds + amp(-5.0) * far + ground + echoes


def record(dry, lag_s=0.0002214, wide_hz=2600):
    """The bass is mono; the right channel's treble comes late and inverted; then the band limit."""
    size = next_fast_len(N + 2048)
    f = np.fft.rfftfreq(size, 1 / SR)
    left, right = rfft(dry, size)
    mid = (left + right) / 2
    side = (left - right) / 2 * np.clip((f - 750) / 400, 0, 1)
    # lag and inversion come in from wide_hz / 2, full at wide_hz
    share = np.clip((f - wide_hz / 2) / (wide_hz / 2), 0, 1)
    turn = np.exp(-1j * (2 * np.pi * f * lag_s - np.pi) * share)
    wide = irfft(np.array([mid + side, (mid - side) * turn]), size)[:, :N]
    band_limit = signal.firwin(511, EDGE_HZ, window=("kaiser", 9), fs=SR)
    return signal.oaconvolve(wide, band_limit[None], "same")


dry = scene()
out = record(dry)
dump_mix(out)
```